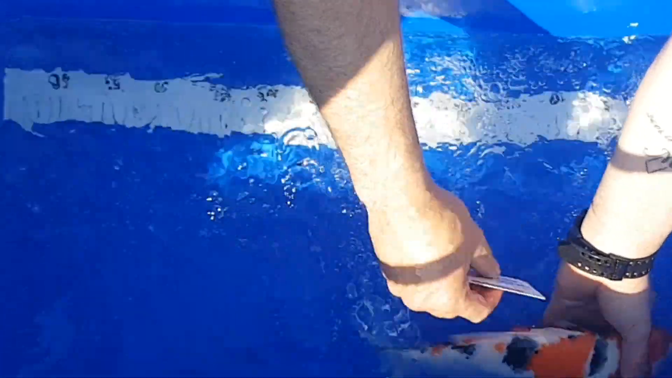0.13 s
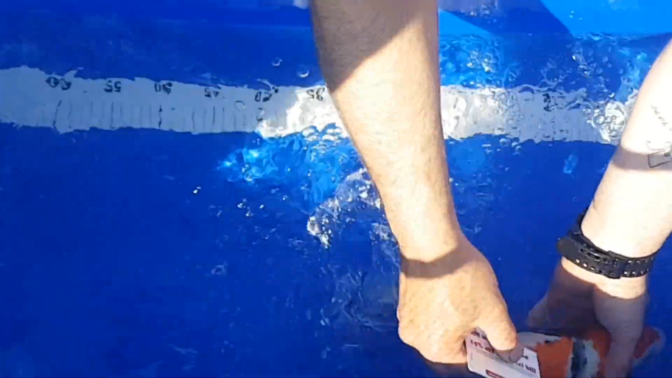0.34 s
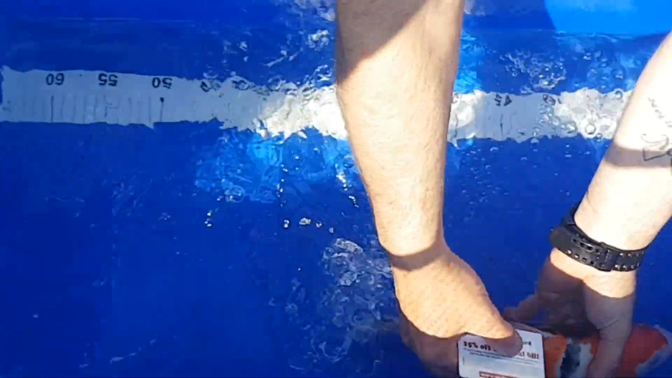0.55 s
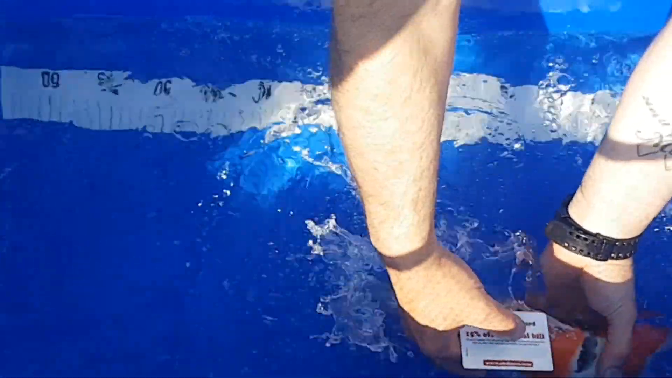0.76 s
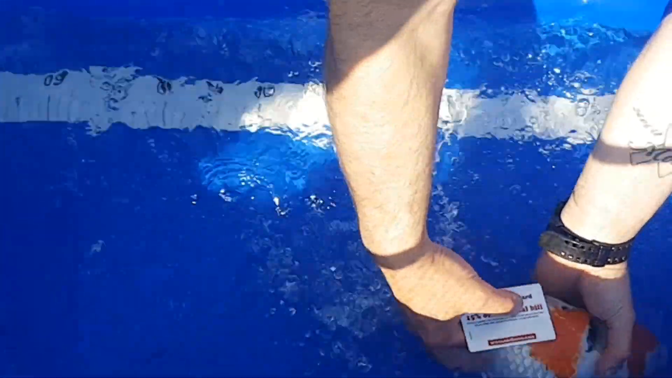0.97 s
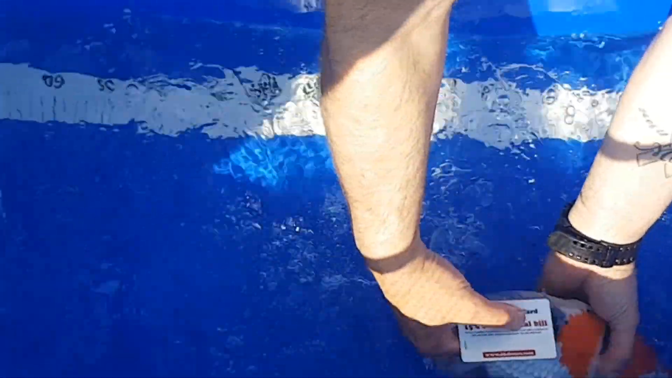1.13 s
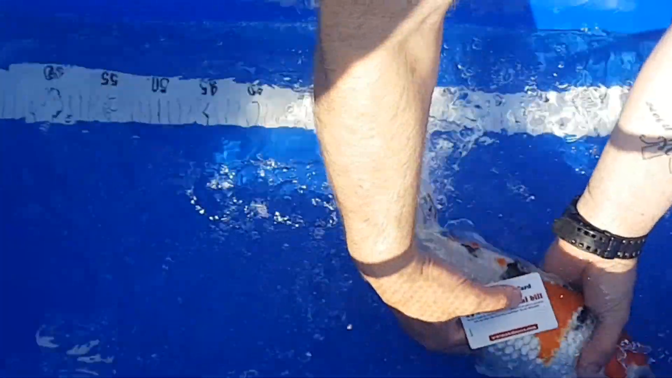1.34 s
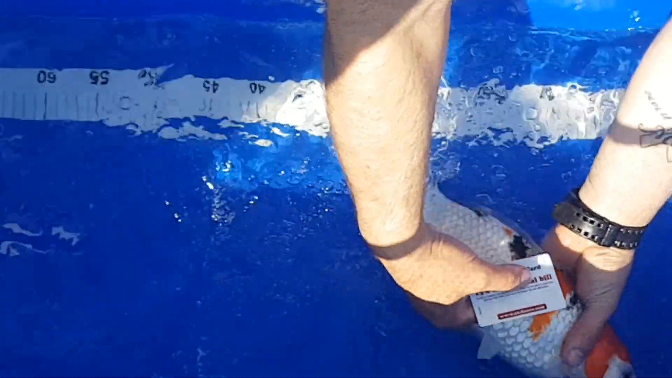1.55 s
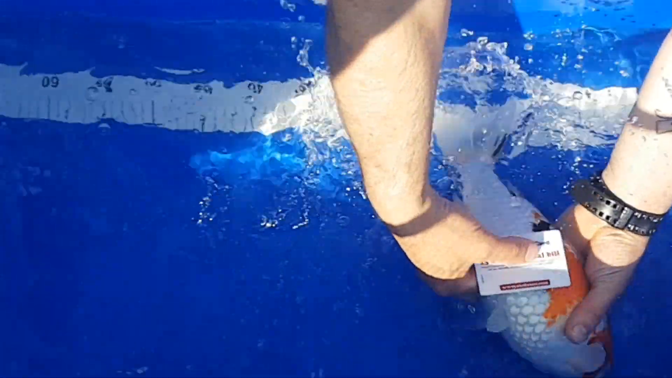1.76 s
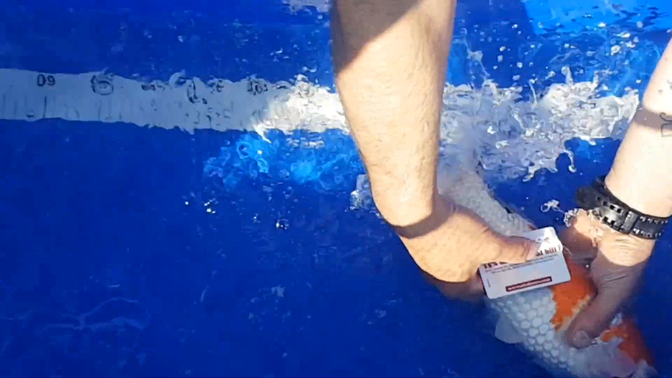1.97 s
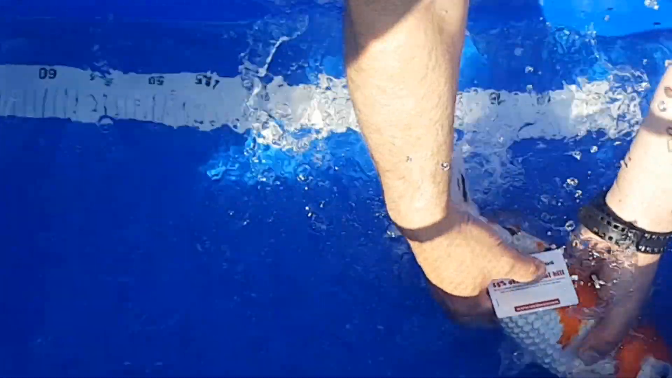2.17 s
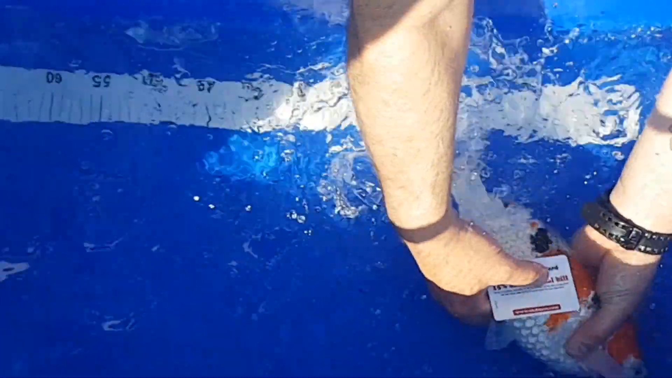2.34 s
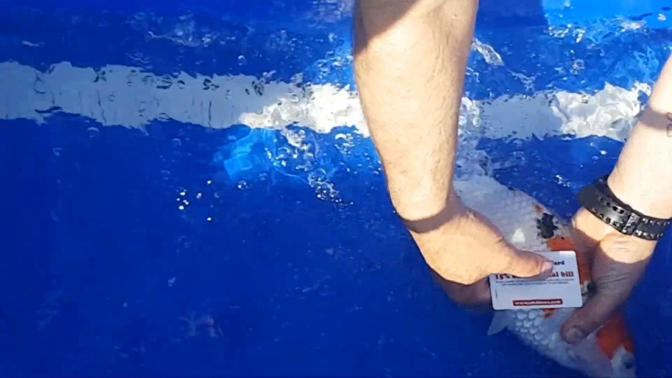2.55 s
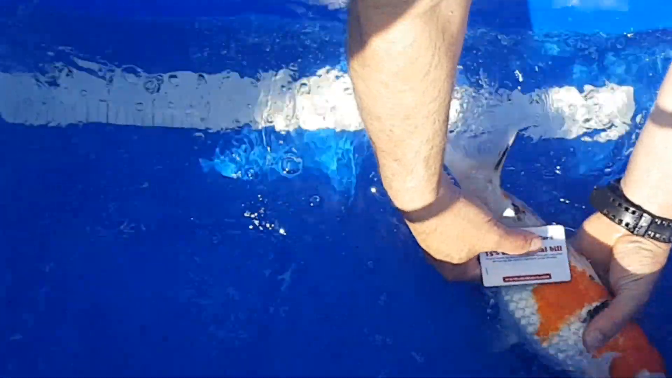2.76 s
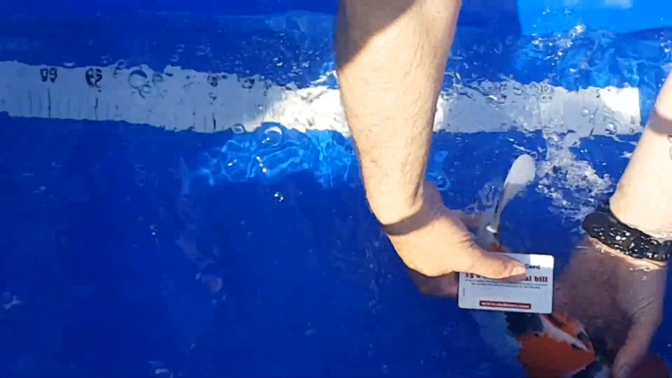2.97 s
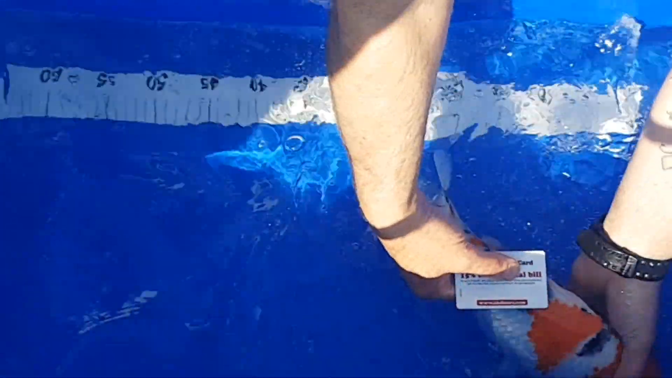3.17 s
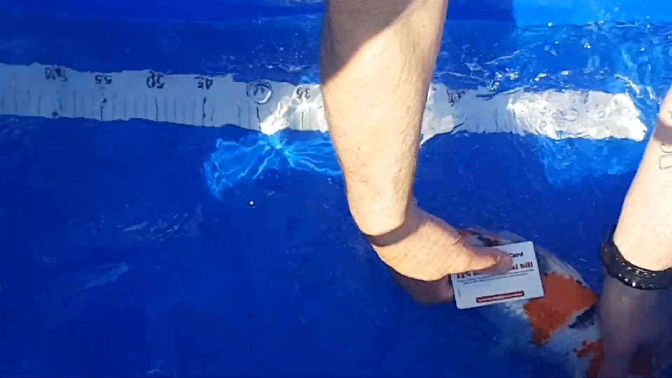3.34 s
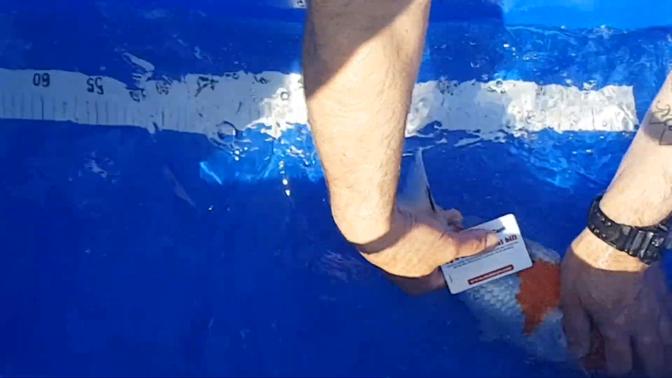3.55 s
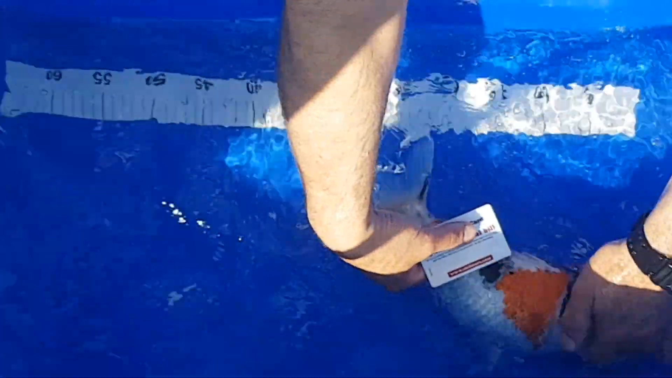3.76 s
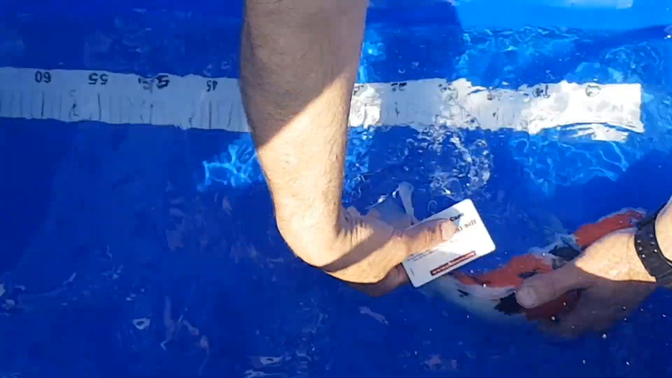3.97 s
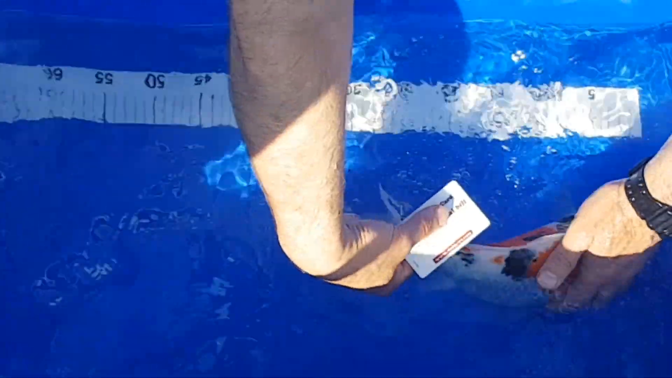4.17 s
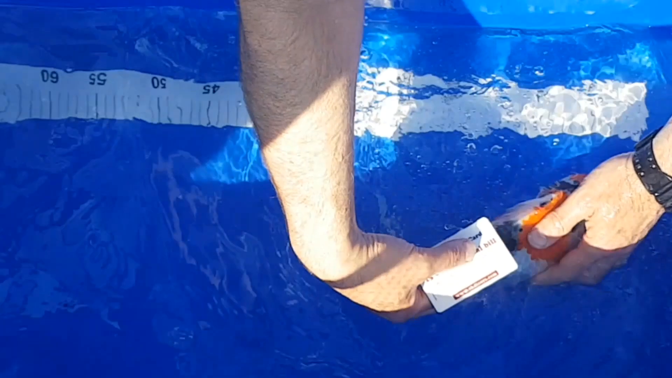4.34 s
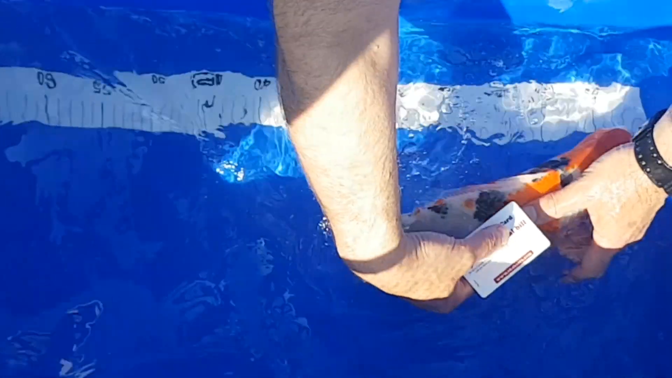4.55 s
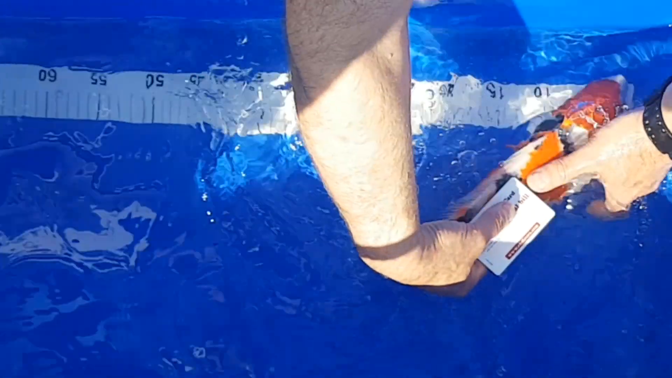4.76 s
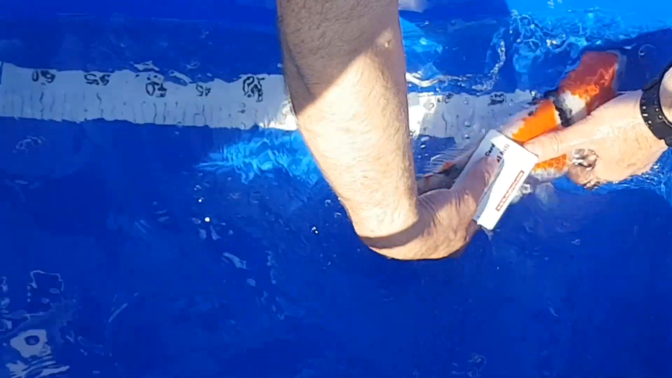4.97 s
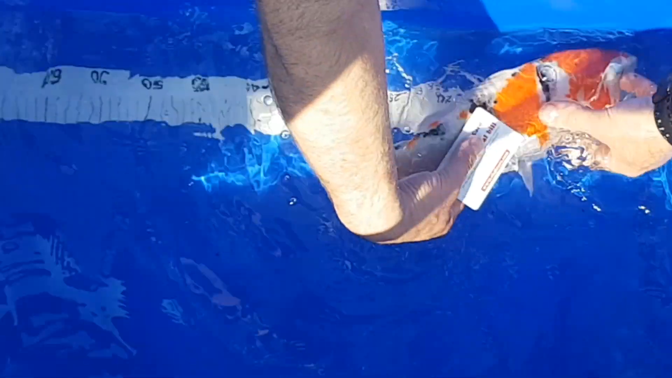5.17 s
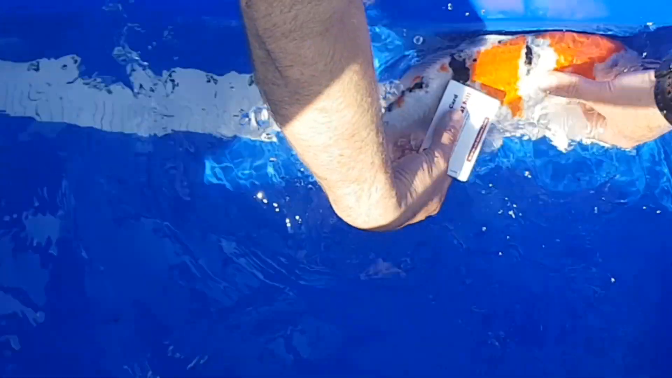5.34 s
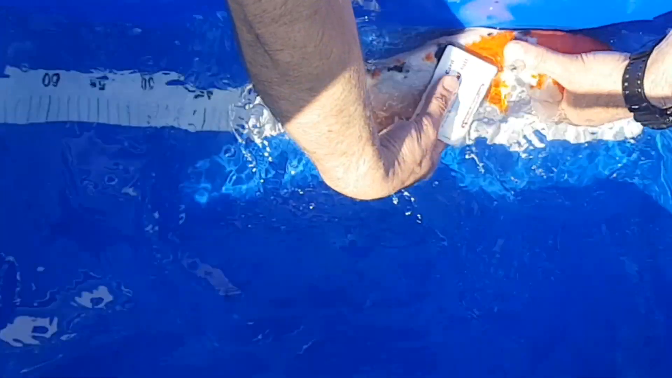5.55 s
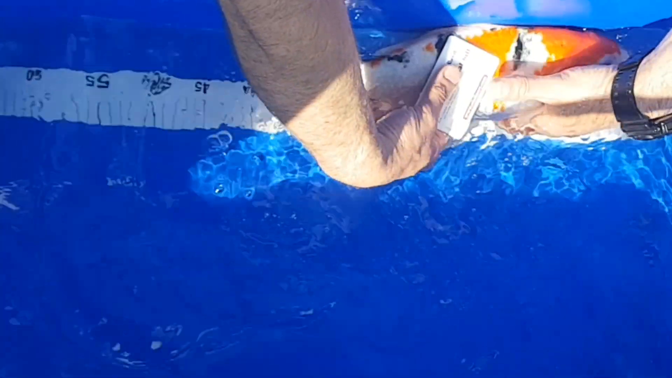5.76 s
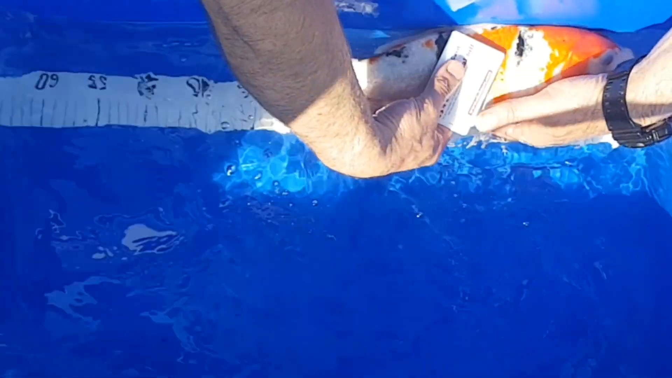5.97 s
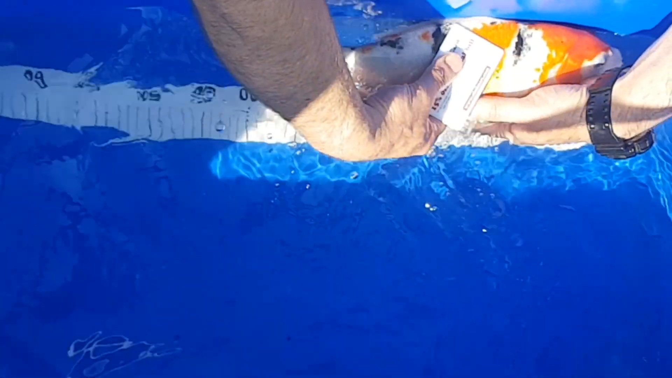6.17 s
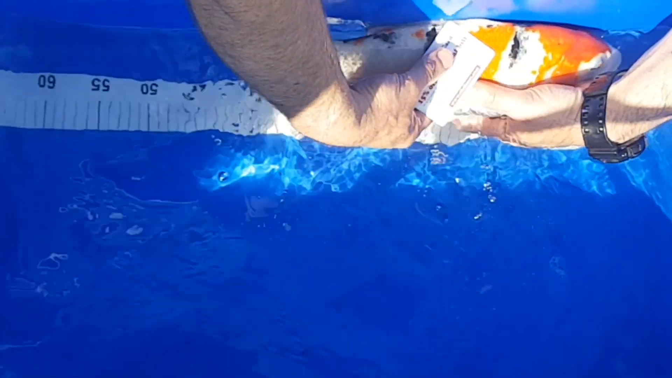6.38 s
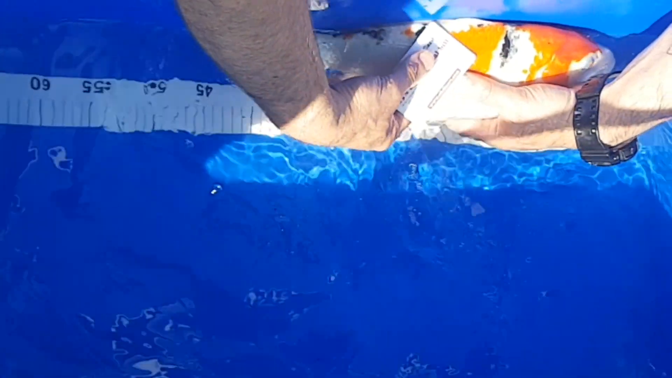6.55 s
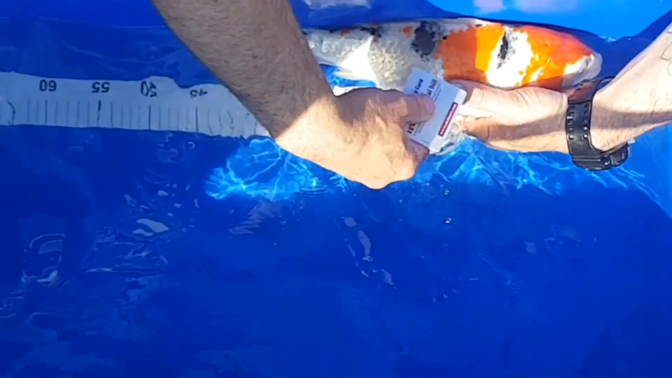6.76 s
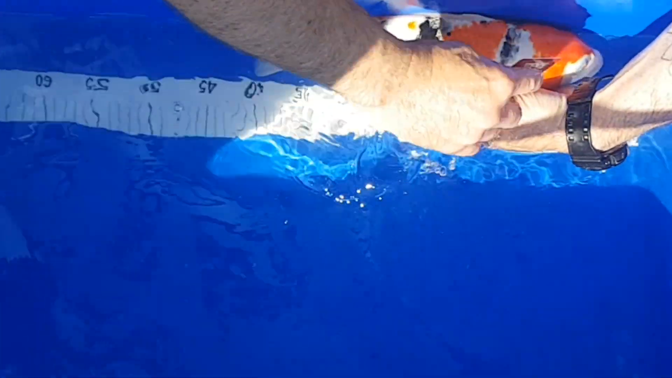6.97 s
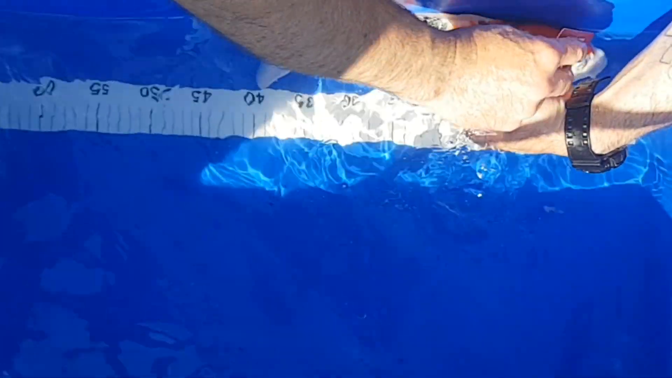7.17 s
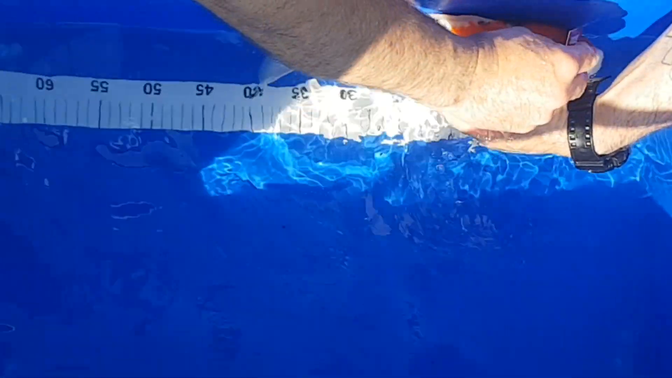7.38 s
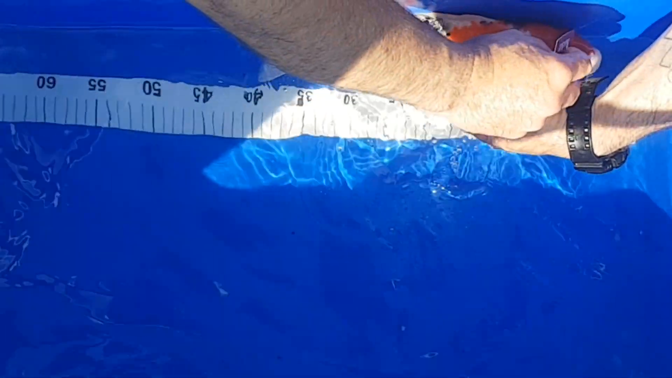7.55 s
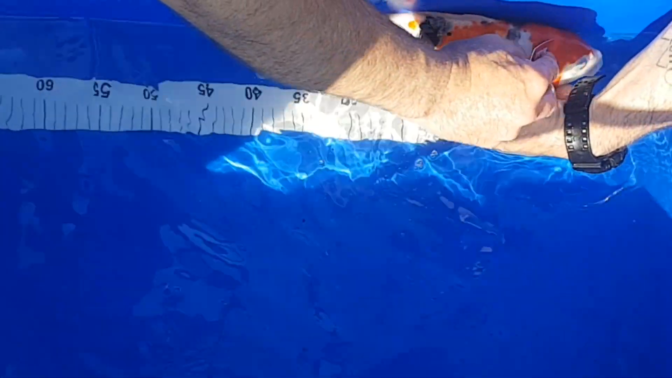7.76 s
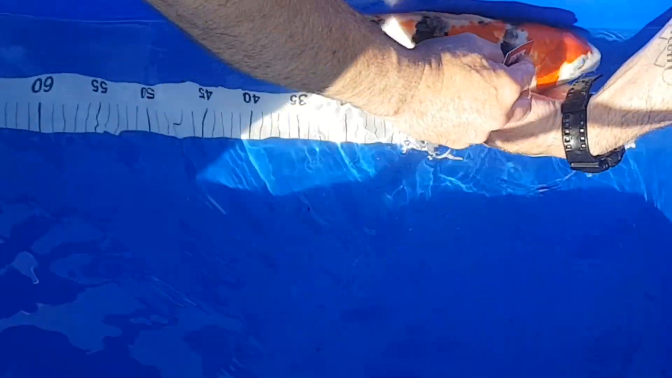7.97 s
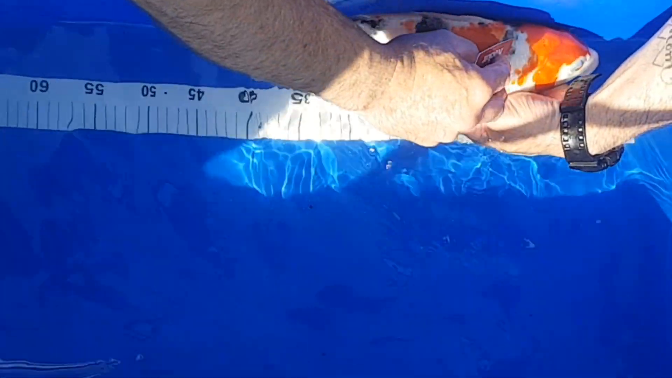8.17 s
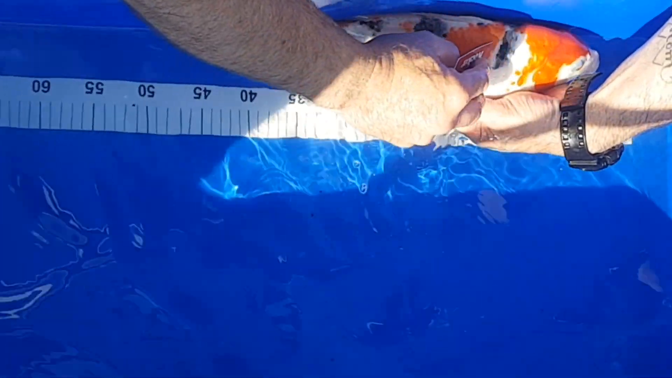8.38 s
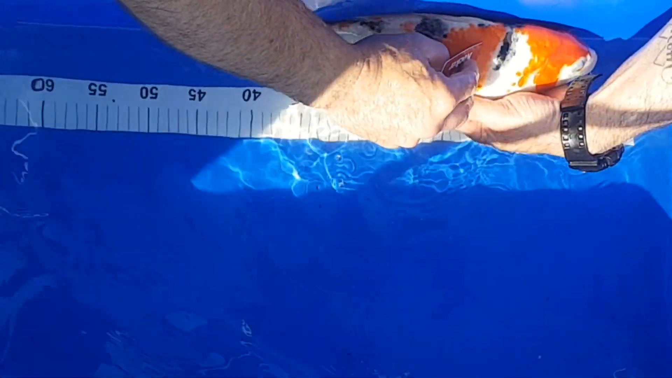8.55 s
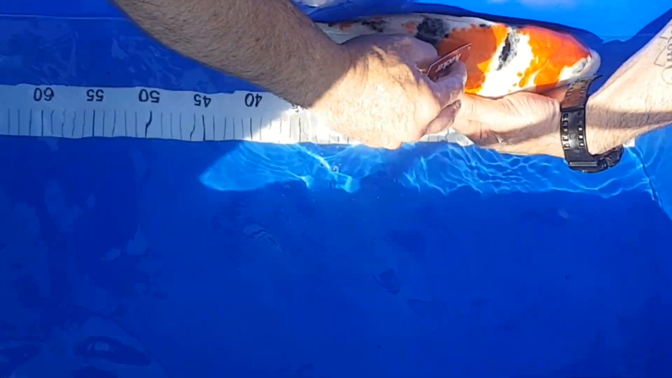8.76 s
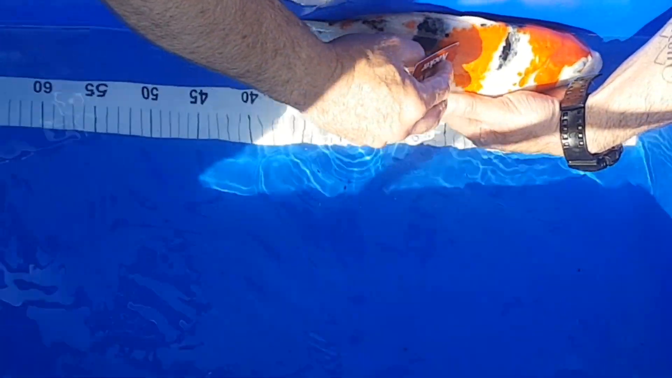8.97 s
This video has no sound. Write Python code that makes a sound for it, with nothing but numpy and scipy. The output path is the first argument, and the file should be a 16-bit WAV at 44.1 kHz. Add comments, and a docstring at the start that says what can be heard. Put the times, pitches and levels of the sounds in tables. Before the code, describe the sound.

Close, lively splashing and gurgling come from a fish struggling in a shallow plastic tub. About halfway through, the water calms to smaller splashes and a few soft thuds against the side. Sparse drips from wet hands follow, along with a brief, quiet rub of wet skin. Behind it all are a faint outdoor hiss and the barely audible hum of a pump.

```python
"""Fish in a plastic bowl

Outdoors, with the microphone near a shallow bowl, a fish thrashes: its tail slaps up spray, trapped
air rings and gulps, and its body knocks on the wall. Then single drips fall from wet hands and a soft
stroke swishes over wet skin. A far hiss and a pump's mains hum lie underneath."""
import sys
import numpy as np
from scipy import signal
from scipy.fft import rfft, irfft, next_fast_len
from scipy.io import wavfile
from scipy.ndimage import map_coordinates

SR = 44100
rng = np.random.default_rng(int(sys.argv[2]) if len(sys.argv) > 2 else 0)


def log_audio(samples):
    """Write samples as a 16-bit WAV file to the path given in sys.argv[1]."""
    # one column per channel
    frames = np.atleast_2d(samples).T
    # limit to full scale, then quantise
    limited = np.clip(frames, -1, 1)
    pcm = np.round(limited * 32767).astype(np.int16)
    wavfile.write(sys.argv[1], SR, pcm)


N = 397782
T = np.arange(N) / SR

# The outdoor hiss, far off. Each row: frequency in Hz, relative spectral level in dB.
FAR_SPECTRUM = [(32, -8), (50, -8.5), (134, -2.5), (266, -9), (600, -6), (1700, -14.5), (2550, -15),
                (3600, -20.5), (16000, -34.5)]
# Partials of the pump's hum. Each row: frequency in Hz, level in dB.
PUMP_PARTIALS = [(149, -68.5), (199.5, -69)]
# Wet skin being rubbed. Each row: frequency in Hz, relative spectral level in dB.
SWISH_SPECTRUM = [(900, -25), (1250, -2), (1650, -14), (2250, -14), (2620, 0), (3300, -10), (9000, -28)]
# The hiss of spray. Each row: frequency in Hz, relative spectral level in dB.
SPRAY_SPECTRUM = [(400, -24), (800, -0.5), (1500, -6.5), (2530, -0.5), (4200, -11), (9100, -28),
                  (16000, -44)]
# Water pushed by tail or hand. Each row: crest in seconds, spray level in dB, slosh level in dB.
WATER_STROKES = [(0.099, -34.5, -45), (0.371, -37.5, -51), (0.5, -34.5, -33), (0.625, -28, -31.5),
                 (0.766, -33.5, -32), (0.933, -25.5, -31.5), (1.19, -35.5, -41.5), (1.32, -31.5, -36),
                 (1.47, -43.5, -47), (1.7, -42.5, -59), (1.84, -37.5, -67), (1.946, -32.5, -32.5),
                 (2.08, -35, -43), (2.246, -25.5, -32), (2.448, -33, -42.5), (2.689, -41, -41),
                 (2.842, -37, -52.5), (3.026, -31.5, -43), (3.439, -46, -52.5), (3.917, -37, -53),
                 (4.121, -64, -58), (4.714, -40, -59), (5.09, -49, -53), (5.4, -49, -56.5)]
# Modes of the plastic wall. Each row: frequency in Hz, relative level in dB, 60 dB decay in seconds.
WALL_MODES = [(176, -5.5, 0.1), (235, 1.5, 0.11), (349, -2, 0.071), (480, -4.5, 0.035)]
# The fish against the wall. Each row: start in seconds, level in dB.
WALL_KNOCKS = [(1.163, -27.5), (4.863, -30.5), (5.072, -27), (5.311, -31)]
# Big bubbles. Each row: start in seconds, level in dB, pitch in Hz, 60 dB decay in seconds,
# pitch rise as in bubble().
AIR_POCKETS = [(0.227, -22.5, 415, 0.092, 0.75), (0.309, -14, 726, 0.076, 0.053),
               (0.396, -11.5, 1180, 0.033, 0.16), (0.465, -12.5, 483, 0.1, 0.087),
               (0.668, -10, 1122, 0.073, 0.091), (0.758, -7.5, 516, 0.065, 0.084),
               (0.824, -11, 1090, 0.092, 0.0056), (0.943, -15, 436, 0.085, 0.39),
               (1.147, -8, 625, 0.038, 0.27), (1.287, -21, 521, 0.075, 0.99),
               (1.887, -21.5, 550, 0.023, 0.32), (1.938, -11, 371, 0.073, 0.23),
               (2.222, -25, 492, 0.13, 0.33), (2.324, -22, 523, 0.082, 0.15),
               (2.37, -22, 1180, 0.054, 0.13), (2.546, -27, 512, 0.081, 0.26),
               (2.992, -14.5, 717, 0.093, 1.22), (3.413, -21.5, 1106, 0.071, 0.12),
               (3.419, -22, 360, 0.033, 0.29), (3.834, -22.5, 550, 0.037, 1.6),
               (3.917, -18.5, 358, 0.072, 1.27), (4.099, -26, 960, 0.049, 0.28),
               (4.731, -34, 964, 0.077, 0.0089), (4.801, -33, 513, 0.04, 0.47),
               (4.936, -34.5, 593, 0.21, 2)]
# Tiny bright droplets. Each row: impact in seconds, level in dB.
DROPLET_TICKS = [(2.143, -29.5), (4.7634, -41), (4.8453, -56), (4.9497, -38), (4.99, -35.5), (5.046, -42.5),
                 (5.2454, -42), (5.3406, -42), (5.6039, -37)]
# Drips from wet hands. Each row: impact in seconds, level in dB, bubble pitch in Hz.
HAND_DRIPS = [(6.21, -41, 4290), (6.248, -35.5, 2530), (6.3586, -30.5, 2300), (6.7192, -32, 3780),
              (6.839, -32.5, 965), (7.047, -35.5, 2870), (7.129, -27, 1740), (7.171, -43, 3440),
              (7.218, -43, 6300), (7.93, -42, 4570), (8.0094, -37, 2810), (8.075, -39, 2370),
              (8.845, -38.5, 2670)]
# The tail on the water. Each row: impact in seconds, level in dB, bubble pitch in Hz,
# relative spatter level in dB, 60 dB decay in seconds.
TAIL_SLAPS = [(0.069, -24, 3670, -18, 0.091), (0.1184, -18.5, 2640, -29, 0.019),
              (0.219, -20.5, 3450, -18.5, 0.023), (0.37, -3.5, 1700, -41, 0.004),
              (0.4868, -19, 2280, -25, 0.23), (0.5655, -18, 2520, -30, 0.011),
              (0.5837, -15, 1630, -16, 0.087), (0.7153, -12, 2500, -39, 0.01),
              (0.7547, -20, 2640, -16.5, 0.2), (0.828, -9, 2404, -19.5, 0.074),
              (0.893, -17.5, 2480, -13, 0.021), (0.9398, -20, 2390, -18, 0.42),
              (1.0156, -19, 2390, -31, 0.02), (1.1497, -7, 1320, -44, 0.021),
              (1.1852, -10, 1720, -39, 0.012), (1.2015, -18.5, 1360, -15, 0.017),
              (1.259, -18.5, 3560, -21, 0.012), (1.3379, -23.5, 2160, -1, 0.014),
              (1.4415, -20.5, 3430, -19, 0.017), (1.4646, -24, 1570, -33, 0.13),
              (1.7812, -24.5, 3800, 8.5, 0.014), (1.7865, -20.5, 2070, -2.5, 0.028),
              (1.8806, -21, 2240, -38, 0.039), (1.926, -11, 2100, -40, 0.15),
              (1.9467, -8, 3750, -10, 0.012), (2.0094, -27.5, 2600, -3, 0.019),
              (2.0373, -22, 2080, -34, 0.12), (2.075, -17.5, 1630, -12, 0.022),
              (2.0981, -19, 2650, -8, 0.011), (2.1859, -13.5, 1650, -22, 0.032),
              (2.2065, -32, 3200, 2.5, 0.08), (2.2296, -15, 2440, -39, 0.23),
              (2.3184, -19.5, 1800, -10, 0.054), (2.4153, -22.5, 4050, -13.5, 0.27),
              (2.4514, -21, 3240, -38.5, 0.12), (2.6692, -16, 1270, -15, 0.013),
              (2.6995, -19, 1710, -41, 0.033), (2.7155, -25.5, 2750, -22, 0.022),
              (2.812, -22.5, 2140, -10.5, 0.049), (2.9306, -10.5, 2380, -15.5, 0.016),
              (2.946, -20, 1310, -9.5, 0.056), (2.9986, -18.5, 2970, -15.5, 0.16),
              (3.04, -20.5, 2500, -21, 0.018), (3.052, -22, 2160, -12.5, 0.047),
              (3.1463, -26, 2330, -18, 0.035), (3.2655, -41, 2130, 2.5, 0.063),
              (3.411, -16.5, 2440, -21, 0.012), (3.487, -25.5, 2720, -26, 0.018),
              (3.5086, -19, 3410, -12.5, 0.0093), (3.5234, -22, 1840, -45, 0.026),
              (3.6258, -25, 2340, -11.5, 0.02), (3.8232, -22.5, 1950, -35, 0.024),
              (3.8658, -31, 2750, -5.5, 0.029), (3.91, -12, 2136, -16.5, 0.066),
              (3.972, -31, 2920, -38, 0.066), (4.002, -26, 2670, -38, 0.028),
              (4.047, -37.5, 2200, -4.5, 0.033), (4.1654, -13.5, 2610, -40, 0.0019),
              (4.192, -35, 3800, -28, 0.022), (4.5554, -37, 3070, -8, 0.024),
              (4.7267, -28.5, 2220, -7, 0.043), (4.803, -27, 3180, -28, 0.013),
              (4.843, -34, 2030, -12, 0.028), (5.086, -27, 1070, -38, 0.021),
              (5.0677, -24, 3380, -23, 0.012), (5.1407, -36, 2800, -16, 0.036),
              (5.208, -21.5, 2480, -11, 0.0095), (5.3732, -31.5, 2300, -45, 0.03),
              (5.4071, -29, 1740, -37, 0.033), (5.513, -45, 4080, -3.5, 0.051)]

TOP_HZ = 15900


def amp(db):
    """Gain of a level in dB."""
    return 10 ** (np.asarray(db) / 20)


def unit(x):
    """Scaled to rms 1."""
    return x / np.sqrt(np.mean(x ** 2) + 1e-20)


def wobble(rate):
    """A smooth random curve, rate knots a second."""
    return map_coordinates(rng.standard_normal(int(N * rate / SR) + 4), [T * rate])


def filtered(x, response):
    """x through a filter whose gain is response(hz)."""
    size = next_fast_len(N + 8192)
    return irfft(rfft(x, size) * response(np.fft.rfftfreq(size, 1 / SR)), size)[..., :N]


def low_cut(x, corner_hz):
    """Rolls off the bass at 24 dB an octave."""
    return filtered(x, lambda hz: 1 / (1 + (corner_hz / (hz + 1)) ** 4))


def noise(spectrum):
    """Noise of rms 1 coloured by (Hz, dB) points."""
    points_hz, db = np.transpose(spectrum)
    colour = lambda hz: amp(np.interp(np.log(hz + 1), np.log(points_hz), db, right=-np.inf))
    return unit(filtered(rng.standard_normal(N), colour))


def add(out, start_s, sound):
    """Mixes a sound in at start_s."""
    part = out[round(start_s * SR):][:len(sound)]
    part += sound[:len(part)]


def bubble(hz, t60, rise, attack):
    """A shrinking or surfacing bubble: a dying sine whose pitch climbs by 2 * rise * hz over t60."""
    t = np.arange(6000) / SR
    phase = 2 * np.pi * hz * (t + rise * t * t / t60)
    return np.sin(phase) * amp(-60 * t / t60) * (1 - np.exp(-t / attack))


def swarm(count, mid_hz, octaves, cycles, spread_db, samples):
    """Many small random bubbles, rms 1, of uneven size and barely rising pitch."""
    starts = (rng.random(count) * N).astype(int)
    pitch, damping, strength = np.hsplit(np.clip(rng.standard_normal((count, 3)), -2, 2), 3)
    hz = mid_hz * 2 ** (octaves * pitch)
    turns = hz * np.arange(samples) / SR
    life = cycles * np.exp(.4 * damping)
    rings = np.sin(2 * np.pi * turns * (1 + .015 * turns / life))
    rings *= np.exp(-turns / life) * (1 - np.exp(-turns / .8)) * amp(spread_db * strength)
    positions = starts[:, None] + np.arange(samples)
    return unit(np.bincount(positions.ravel(), rings.ravel(), N + samples)[:N])


def far_hiss():
    """The open air in the distance, an almost steady hiss."""
    return amp(-59.5 + .19 * wobble(9.3)) * noise(FAR_SPECTRUM)


def pump_hum():
    """A pump's faint mains hum, wavering in level and phase."""
    return sum(amp(db + 2.5 * wobble(6)) * np.sin(2 * np.pi * hz * T + .8 * wobble(4))
               for hz, db in PUMP_PARTIALS)


def lapping():
    """Small ripples lap softly at hands and wall."""
    return amp(-70) * swarm(count=60, mid_hz=680, octaves=.3, cycles=5, spread_db=2.5, samples=2600)


def trickle():
    """Faint droplets keep ticking drily into the water, ever fainter."""
    droplets = swarm(count=500, mid_hz=3200, octaves=.5, cycles=2.3, spread_db=4.2, samples=400)
    return amp(-59.5 - 1.1 * T) * droplets


def skin_swish(crest_s=7.77, hold_s=.06, rise_db_per_s=130):
    """A soft stroke over wet skin: the rubbing hiss swells, holds and stops."""
    level_db = -54 - rise_db_per_s * np.clip(crest_s - T, 0, None)
    return amp(level_db + 1.6 * wobble(60)) * (T < crest_s + hold_s) * noise(SWISH_SPECTRUM)


def stirring(levels_db, fade_db_per_s, calm_db=-np.inf, swell_db_per_s=141):
    """Gain that swells into every stroke and fades after it, over calm water."""
    since_crest = T[::64] - np.transpose(WATER_STROKES)[0][:, None]
    db = levels_db[:, None] - np.where(since_crest > 0, fade_db_per_s, -swell_db_per_s) * since_crest
    power = np.sum(amp(db) ** 2, axis=0) + amp(calm_db) ** 2
    return np.interp(T, T[::64], np.sqrt(power))


def churn():
    """Stirred water: spray of tiny bubbles, hiss and crackle, slosh of larger bubbles and a low surge."""
    _, spray_db, slosh_db = np.transpose(WATER_STROKES)
    surge_db = -44 + .86 * (spray_db - spray_db.max())
    clumps = amp(4.4 * wobble(32))  # all three parts of the spray flicker together
    hiss = noise(SPRAY_SPECTRUM) * amp(3.2 * wobble(190))
    fizz = swarm(count=3400, mid_hz=2450, octaves=.5, cycles=5.8, spread_db=6.5, samples=650)
    crackle = swarm(count=1500, mid_hz=5000, octaves=.4, cycles=1.2, spread_db=4, samples=120)
    spray = amp(-3.5) * unit(clumps * hiss) + unit(clumps * fizz) + amp(-12) * unit(clumps * crackle)
    slosh = swarm(count=1500, mid_hz=560, octaves=.5, cycles=4.5, spread_db=3.5, samples=1800)
    surge = unit(noise([(25, -18), (60, -3), (140, -1), (400, -14)]) * amp(4.5 * wobble(14)))
    return (stirring(spray_db, fade_db_per_s=91, calm_db=-68) * spray
            + stirring(slosh_db, fade_db_per_s=141) * slosh
            + stirring(surge_db, fade_db_per_s=119.5, calm_db=-73) * surge)


def wall_knocks():
    """The fish hits the water-loaded plastic wall, which thuds at new mode strengths each time."""
    thuds = np.zeros(N)
    for start_s, db in WALL_KNOCKS:
        offsets_db = rng.normal(0, 1.5, len(WALL_MODES))
        modes = [amp(mode_db + offset_db) * bubble(hz, t60, rise=0, attack=.0015)
                 for (hz, mode_db, t60), offset_db in zip(WALL_MODES, offsets_db)]
        add(thuds, start_s, amp(db) * sum(modes))
    return low_cut(thuds * amp(2.5 * wobble(90)), corner_hz=120)


def gulps():
    """Large air pockets gulp unevenly, their pitch fluttering as the surface shakes."""
    pockets = np.zeros(N)
    for start_s, db, hz, t60, rise in AIR_POCKETS:
        add(pockets, start_s, amp(db) * bubble(hz, t60, rise, attack=.073 * t60))
    flutter = 9 * wobble(130)  # samples early or late
    return map_coordinates(pockets, [np.arange(N) + flutter], order=1) * amp(4.5 * wobble(170))


def bowl(impacts, tail_t60=.04):
    """Small impacts carry no bass; the walls add a short diffuse tail that changes as the water moves."""
    direct = low_cut(impacts, corner_hz=800)
    t, hop, out = np.arange(3000) / SR, SR // 8, direct.copy()
    for start in range(0, N, hop):
        tail = rng.standard_normal(len(t)) * amp(-60 * t / tail_t60) * (t > .0012)
        reflections = signal.fftconvolve(direct[start:start + hop], tail / np.linalg.norm(tail))
        add(out, start / SR, amp(-7) * reflections)
    return out


def splashes(rows, burst_db, longest_ring_s=.045):
    """Each impact (a row as in TAIL_SLAPS) makes a frothy burst, a brighter spatter and a bubble."""
    burst_gain, spatter_gain, rings = np.zeros((3, N))
    lead_s = 1500 / SR  # the first drops land early
    since_crest = np.arange(6000) / SR - lead_s - .0008
    for impact_s, db, hz, spatter_db, t60 in rows:
        envelope = amp(-60 * np.abs(since_crest) / np.where(since_crest > 0, t60, .48 * t60))
        add(burst_gain, impact_s - lead_s, amp(db + burst_db) * envelope)
        add(spatter_gain, impact_s - lead_s, amp(db + spatter_db) * envelope)
        add(rings, impact_s, amp(db) * bubble(hz, min(t60, longest_ring_s), rise=.1, attack=1.5 / hz))
    treble = noise([(1800, -15.5), (3500, 2.5), (5000, -3.5), (9000, -16.5), (16000, -38)])
    spatter = spatter_gain * amp(3.5 * wobble(250)) * treble
    froth = swarm(count=5000, mid_hz=2260, octaves=.521, cycles=7.5, spread_db=3.5, samples=500)
    burst = burst_gain * amp(3 * wobble(120)) * (froth + amp(-6) * noise(SPRAY_SPECTRUM))
    return burst + spatter + rings * amp(1.5 * wobble(300))


def droplet_ticks(hz=6100, spatter_db=-2, t60=.014):
    """Tiny droplets hit the water with a short, bright tick."""
    return splashes([(s, db, hz, spatter_db, t60) for s, db in DROPLET_TICKS], burst_db=-22)


def hand_drips(spatter_db=-25, decay_cycles=47.5):
    """Drips fall from wet hands and each traps a bubble; the lower ones ring longer."""
    return splashes([(s, db, hz, spatter_db, decay_cycles / hz) for s, db, hz in HAND_DRIPS], burst_db=-25)


def tail_slaps():
    """The tail smacks the shallow water, throwing up froth and trapping air."""
    return splashes(TAIL_SLAPS, burst_db=-9.5)


def scene():
    """The bowl close by and the background beyond it, in mono."""
    impacts = hand_drips() + droplet_ticks() + tail_slaps() + trickle()
    close_by = bowl(impacts) + gulps() + lapping() + wall_knocks() + churn() + skin_swish()
    return (close_by + pump_hum() + far_hiss())[None]


def record(dry):
    """The microphone chain passes nothing above its band limit."""
    return filtered(dry, lambda hz: hz < TOP_HZ)


dry = scene()
out = record(dry)
log_audio(out)
```